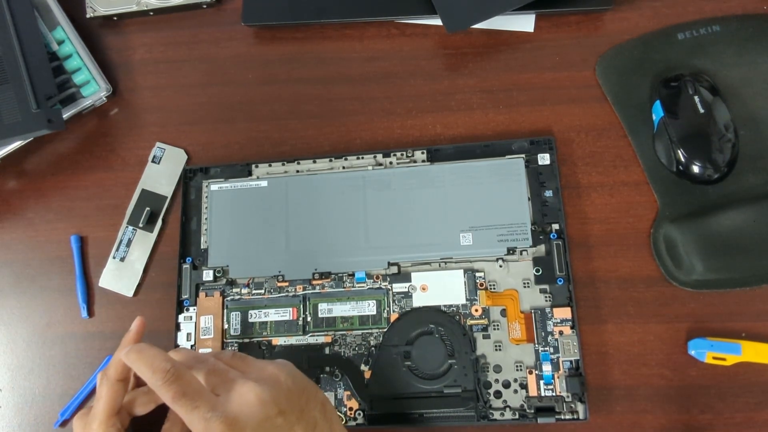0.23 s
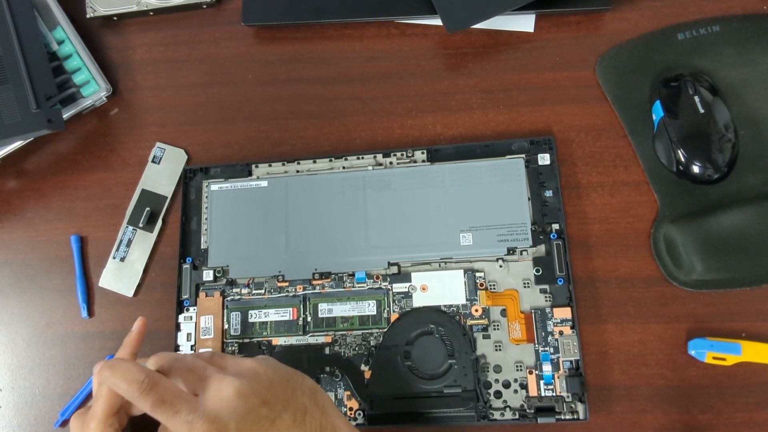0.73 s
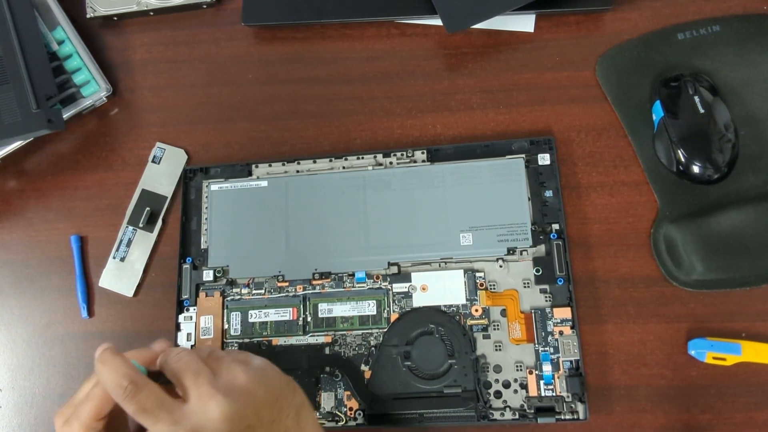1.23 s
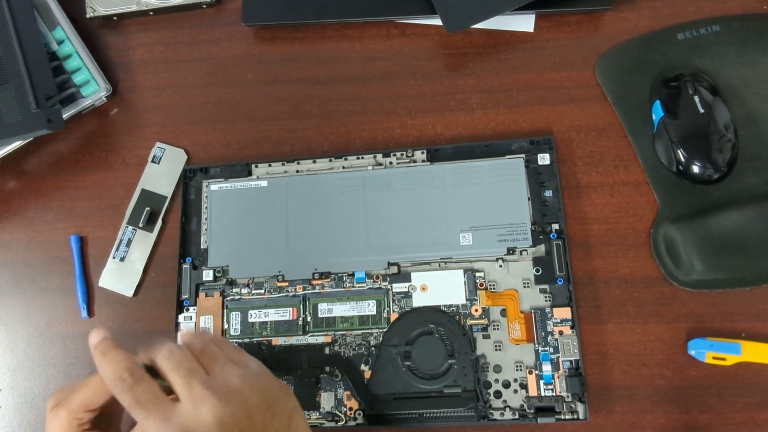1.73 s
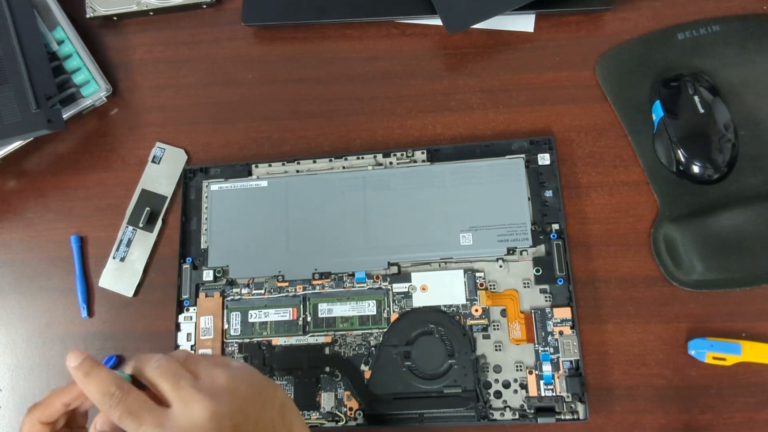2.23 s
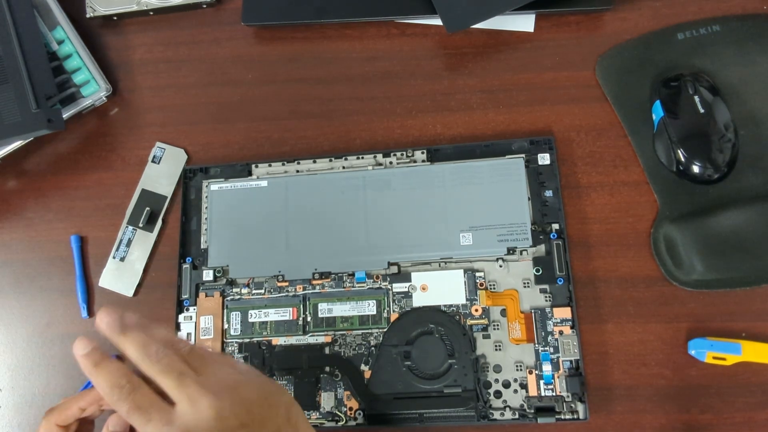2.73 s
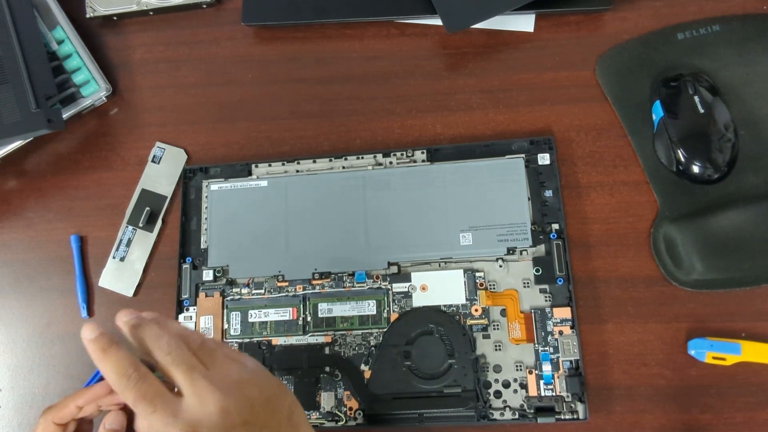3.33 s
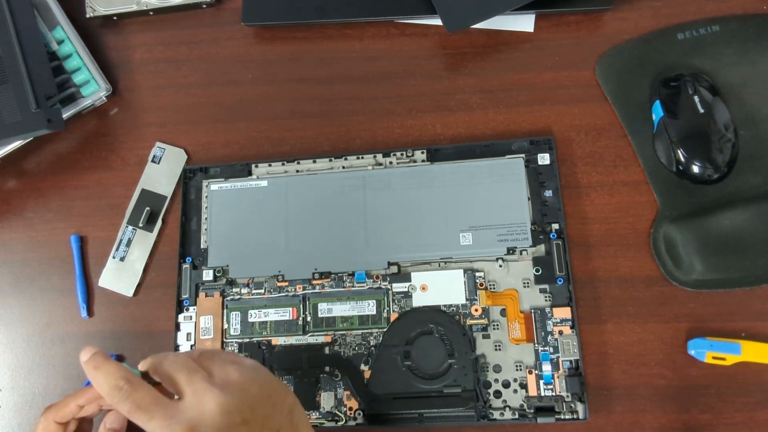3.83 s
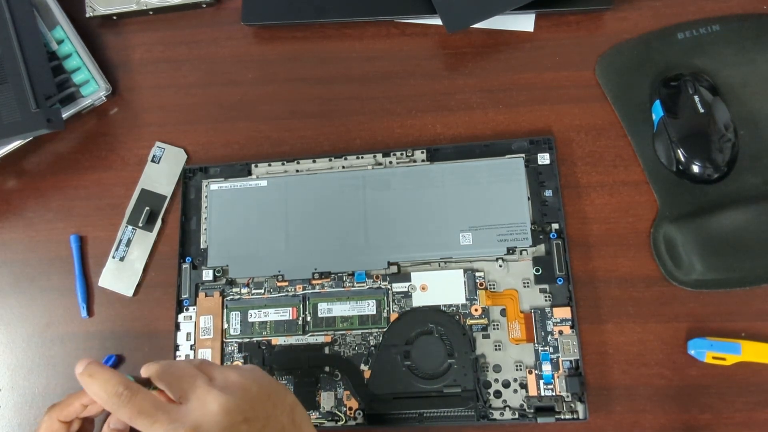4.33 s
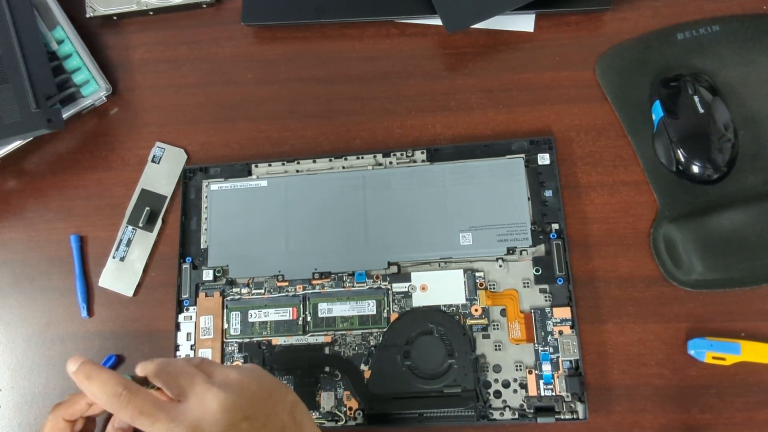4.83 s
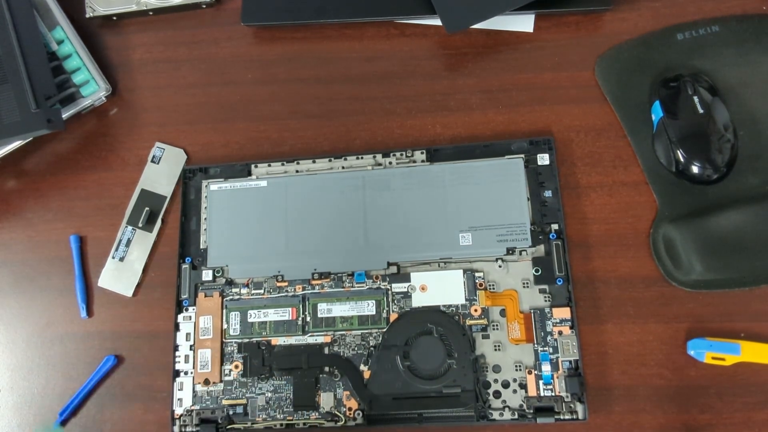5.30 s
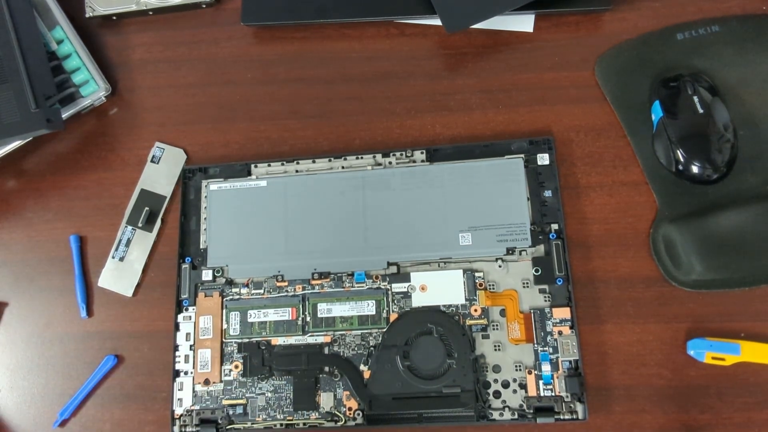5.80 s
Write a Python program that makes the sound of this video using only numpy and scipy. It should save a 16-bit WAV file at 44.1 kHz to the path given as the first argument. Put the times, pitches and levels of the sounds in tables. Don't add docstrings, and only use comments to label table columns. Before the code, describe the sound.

Close to the microphone, hands work a hard plastic tool: a handful of irregular clicks, the sharpest early on, with faint scuffs and dull desk knocks. The later clicks are weaker and sparser. Near the end the tool drops on the wooden desk and bounces, two loud ringing clacks. Behind lie low ventilation rumble, thin hiss and a faint clock tick, chopped by noise suppression.

```python
import sys
import numpy as np
from scipy import signal
from scipy.io import wavfile
from scipy.ndimage import uniform_filter1d

SR = 44100
rng = np.random.default_rng(int(sys.argv[2]) if len(sys.argv) > 2 else 0)


def volts(x):
    e = np.asarray(x, float) / 20
    return 10 ** e


def generate_wav(signal):
    frames = np.transpose(np.atleast_2d(signal))
    scaled = np.clip(frames, -1, 1) * 32767
    pcm = np.round(scaled).astype(np.int16)
    wavfile.write(sys.argv[1], SR, pcm)


N = 267246

# [bright crack, relative dB]
CLICKS = [(0.084, -41, 1100, -3.5, -27), (0.898, -44.5, 1700, -8.5, -53), (.98, -29, 1200, 7.5, -24),
          (1.4514, -22.5, 2830, -3, -21.5), (1.7883, -41, 1200, -1.5, -33), (2.0072, -38.5, 1220, 0.5, -33),
          (2.073, -55.5, 1250, -13, -42), (2.2562, -41.5, 4290, -10.5, -35), (2.5647, -53.5, 3000, 20, -29),
          (2.8691, -48, 1350, -9.5, -20.5), (3.1823, -61.5, 3100, -8.5, -44), (4.482, -42, 3950, -1, -16),
          (5.024, -53.5, 3150, -13, -5.5)]
# [time to fade by 60 dB, s]
SCUFFS = [(0.973, -60, 3080, -13, 0.036), (1.059, -69.5, 3180, -14, 0.059), (1.4227, -57.5, 1160, -6, 0.15),
          (1.684, -67.5, 2400, 18, 0.16), (1.946, -76.5, 3110, -14, 0.45), (2.324, -73, 1300, -3.5, 0.51),
          (2.651, -79, 2730, -5, 0.28), (2.95, -77.5, 1980, -1, 0.11), (3.279, -74.5, 3000, -10, 0.1),
          (3.588, -80, 3300, -7.5, 0.17), (4.676, -76.5, 1167, -22.5, 0.083), (5.3, -78, 3400, -27, .08),
          (5.35, -76.5, 3400, -20, 0.038), (5.58, -79, 1480, -6, 0.26), (5.8847, -37, 9950, -18.5, .11)]
# pitch_hz [Hz], width_hz [Hz], level_db [dB]
PLASTIC_RINGS = [(2202, 300, 6), (3150, 410, 3), (4944, 210, -11), (1200, 220, -2.5)]


def click(level_db, pitch_hz, rest_db, crack_db, t60_s, direct_db=-3):
    modes = [(pitch_hz, 280, 0)]
    modes += [(hz, width_hz, db + rest_db) for hz, width_hz, db in PLASTIC_RINGS]
    body = ring(room(t60_s, direct_db), modes)
    body = signal.lfilter(*signal.butter(2, [750, 5600], "band", fs=SR), body)
    crack_modes = [(7240, 1800, 0), (11120, 1000, 3), (13350, 5800, -10)]
    crack = ring(room(0.5 * t60_s, direct_db - 14.5), crack_modes)
    crack = signal.lfilter(*signal.butter(2, 5000, "high", fs=SR), crack)
    return peaked(body, level_db) + peaked(crack, level_db + crack_db)


# [share straight from the desk, dB]
DROPS = [
    (5.7139, -21, .18, 12),
    (5.864, -16, 0.21, 7.5),
]
# pitch_hz [Hz], width_hz [Hz], level_db [dB]
LANDING_RINGS = [
    [(397, 14, -2.5), (737, 34, 0), (1176, 120, -6), (1550, 44, 4), (2030, 120, -7), (2430, 120, 2),
     (2720, 240, -15), (3720, 166, -3.5), (3890, 140, -6.5), (5580, 48, -12), (9340, 990, -22.5)],
    [(573, 19, -13), (755, 35, 6.5), (1183, 150, -5.5), (1353, 52, 6), (1432, 110, 1.5), (1757, 14, 5),
     (2130, 27, -6), (2450, 85, -6.5), (2610, 33, -5.5), (3400, 270, -9.5), (4380, 43, -9.5),
     (6160, 560, -23), (9950, 130, -22.5)],
]
# pitch_hz [Hz], level_db [dB per Hz]
KNOCK_COLOURS = [
    [(59, -24), (100, -47.5), (398, 9.5), (535, -3.5), (801, 11.5), (1030, -2.5), (2580, 7), (5650, -8),
     (7610, -9.5), (11600, -17), (16000, -21)],
    [(59, -62), (100, -4.5), (433, 7.5), (801, 8.5), (2800, 7.5), (3780, -18.5), (4980, -17.5), (6420, -27),
     (7610, -29), (10200, -14), (16000, -17)],
]


def drop(level_db, t60_s, direct_db, modes, knock_colour):
    low, high = (signal.butter(1, 3500, kind, fs=SR) for kind in ("low", "high"))
    slow, quick = (room(share * t60_s, direct_db, wet_db=10.5, rattle_s=0.0055) for share in (1, 0.7))
    hit = signal.lfilter(*low, slow) + signal.lfilter(*high, quick)
    knock = peaked(colour(hit, knock_colour), 0)
    rings = peaked(ring(hit, modes), -4.5)
    return peaked(knock + rings, level_db)


# [deep thud, relative dB]
BUMPS = [(0.08, -48, 454, 0.25, -19), (0.897, -48, 355, 0.14, -17), (0.978, -55.5, 407, 0.16, -8),
         (1.205, -65, 392, 0.059, 2), (1.436, -51.5, 231, 0.36, 0), (1.453, -41.5, 347, 0.11, -6.5),
         (1.792, -47.5, 417, 0.17, 9.5), (2.016, -48, 300, 0.15, 5.5), (2.074, -45.5, 407, 0.14, 11),
         (2.327, -64.5, 394, 0.14, -1), (2.953, -65, 398, 0.2, 3), (3.182, -63, 482, 0.14, 10.5),
         (3.695, -65.5, 474, 0.026, -3), (3.81, -58.5, 315, 0.088, 4), (4.349, -57, 470, 0.088, 7),
         (4.363, -50, 398, 0.12, 6), (4.485, -48.5, 400, 0.14, 9), (4.677, -54.5, 336, 0.21, 7.5),
         (5.208, -63, 413, 0.084, -3), (6.016, -44.5, 356, 0.14, -5)]


def bump(level_db, pitch_hz, t60_s, thud_db):
    modes = [(pitch_hz, 100, 0), (1.9 * pitch_hz, 160, -11), (0.79 * pitch_hz, 110, -3), (135, 55, thud_db)]
    dull = signal.lfilter(*signal.butter(2, 750, fs=SR), room(t60_s, -14.5, rise_s=0.002))
    return peaked(ring(dull, modes), level_db)


# start_s [s], level_db [peak dB]
TICKS = [
    (0.81, -69.5),
    (1.814, -50.5),
    (2.813, -67),
    (3.809, -61.5),
    (4.812, -60.5),
    (5.809, -60.5),
]
# pitch_hz [Hz], width_hz [Hz], level_db [dB]
CLOCK_CASE = [(1127, 133, 9), (1350, 250, 2.5), (1796, 155, 3), (2260, 680, -3), (4370, 1800, -15.5),
              (10400, 6100, -26.5)]


def tick(level_db):
    case = ring(room(0.11, -56, rise_s=0.057), CLOCK_CASE)
    return peaked(signal.lfilter(*signal.butter(3, 980, "high", fs=SR), case), level_db)


# pitch_hz [Hz], level_db [dB per Hz]
AIR = [(90, -17), (140, -5), (185, 0.5), (228, -12), (285, -2), (400, -5), (790, -19), (1000, -24),
       (2000, -29.5), (2700, -30.5), (3300, -30.5), (4500, -37), (8000, -39), (16000, -41)]
# pitch_hz [Hz], likeness [0 to 1]
SAME = [(60, .97), (150, .92), (380, .65), (950, .3), (2400, .22), (6000, .1)]
# start_s [s], level_db [dB over the hiss]
HANDS = [
    (0.0, 6),
    (0.28, 13),
    (0.6, 3),
    (1.05, 7.5),
    (1.9, 10.5),
    (2.7, 8),
    (3.4, 7.5),
    (4.1, 4),
    (5.3, 6.5),
    (5.7, 12),
]


def hiss():
    hop, size = 256, 1024
    frames, hz = N // hop + 5, np.fft.rfftfreq(size, 1 / SR)
    a, b, c, d, patches = rng.standard_normal((frames, len(hz), 5)).T
    patches = uniform_filter1d(uniform_filter1d(patches, size=10, axis=0), size=6, axis=1)
    same = np.clip(read(SAME, hz), -1, 1)[:, None]
    left = a + 1j * b
    right = same * left + np.sqrt(1 - same ** 2) * (c + 1j * d)
    spectra = np.array([left, right]) * volts(read(AIR, hz)[:, None] + 0.86 * evened(patches))

    t = np.arange(frames) * hop / SR
    hum_db = -2 + 0.1 * shutting(t) + 0.82 * waking(t)
    rustle_db = np.interp(t, *np.transpose(HANDS)) + waking(t)
    hum_share = read([(600, 1), (1300, 0.2), (16000, 0.12)], hz)[:, None]
    rustle_share = read([(500, 0), (1100, 1), (4500, 1), (6000, 0.5)], hz)[:, None]
    swell = volts(hum_share * hum_db + rustle_share * rustle_db)
    steady, swelling = (signal.istft(spectra * gain, nperseg=size, noverlap=size - hop)[1][:, :N]
                        for gain in (1, swell))
    return volts(-73) * swelling / steady.std()


# pitch_hz [Hz], width_hz [Hz], level_db [dB]
DUCT = [(59.3, 45, 3), (99.7, 72, -8), (167, 6.7, -19)]


def rumble():
    shared, *ports = rng.standard_normal((3, N))
    duct = ring(shared + 0.14 * np.array(ports), DUCT)
    duct = signal.sosfilt(signal.butter(4, 200, fs=SR, output="sos"), duct)
    flutter = np.sqrt(uniform_filter1d((duct ** 2).mean(0), size=1200))
    t = np.arange(0, N + 64, 64) / SR
    level_db = -56 + shutting(t) + 0.2 * waking(t)
    return evened(duct / flutter ** 0.25) * volts(np.interp(np.arange(N) / SR, t, level_db))


# centre_s [s], change_db [dB], half_length_s [s]
SHUTS = [(0.0, -25, 0.021), (0.226, -9, 0.22), (0.394, -27, 0.026), (0.476, -29, 0.03), (0.633, -9, 0.035),
         (0.864, -7.5, 0.082), (.96, -27, 0.023), (1.0, 7.5, 0.035), (1.042, -11, 0.016),
         (1.158, -15.5, 0.1), (1.32, -10, .14), (1.568, -17, 0.059), (1.688, -18, 0.069), (1.824, -7, 0.11),
         (1.958, -23, 0.036), (2.14, -8.5, 0.029), (2.257, -15.5, 0.051), (2.44, -9.5, 0.11),
         (2.741, -16, 0.048), (3.048, -9, 0.043), (3.23, 6.5, 0.062), (3.445, -7.5, 0.053),
         (3.629, -9, 0.031), (4.11, -12, 0.065), (4.321, -15, 0.028), (4.6, -7, .08), (4.772, -18, 0.049),
         (4.952, -3.5, 0.2), (5.24, -8.5, 0.19), (5.5, -9.5, 0.15)]


def shutting(t):
    centre_s, change_db, half_s = np.transpose(SHUTS)[:, :, None]
    return (change_db * np.clip(1 - abs(t - centre_s) / half_s, 0, 1)).sum(0)


def waking(t):
    rise_db, rise_s = 20.5, 0.11
    since_landing = np.maximum(t - DROPS[-1][0], 0)
    return rise_db * (1 - np.exp(-since_landing / rise_s))


def room(t60_s, direct_db, wet_db=-12, rise_s=0.00033, rattle_s=0.0011):
    bass_hz, left_db = 850, 3.4
    first_touch = 3
    t = np.arange(SR // 3) / SR
    echoes = rng.standard_normal((3, len(t))) * (rng.random((3, len(t))) < 0.15)
    echoes *= volts(wet_db - 60 * t / max(t60_s, 0.03)) * (1 - np.exp(-t / rise_s))
    contact = (rng.standard_normal(len(t)) + first_touch * (t == 0)) * np.exp(-t / rattle_s)
    contact *= volts(direct_db) * np.sqrt(rattle_s * SR / 2) / np.linalg.norm(contact)
    low, high = (signal.butter(2, bass_hz, kind, fs=SR) for kind in ("low", "high"))
    ports = signal.lfilter(*low, contact + echoes[:1]) + signal.lfilter(*high, contact + echoes[1:])
    treble = signal.lfilter(*signal.butter(1, 3000, "high", fs=SR), ports)
    return ports + treble * (volts(np.array([[left_db], [-left_db]])) - 1)


def ring(x, modes):
    out = 0
    for k, (hz, width_hz, db) in enumerate(modes):
        pole = np.exp((2j * np.pi * hz - np.pi * width_hz) / SR)
        tone = 2 * signal.lfilter([1 - abs(pole)], [1, -pole], x + 0j).real
        out = out + (-1) ** k * volts(db) * tone
    return out


def colour(x, points):
    gain_db = np.maximum(read(points, abs(np.fft.fftfreq(4096, 1 / SR))), -100)
    log_gain = np.log(volts(gain_db))
    taps = np.fft.ifft(np.exp(np.conj(signal.hilbert(log_gain)))).real[:2048]
    return signal.fftconvolve(x, taps[None], axes=1)[:, :x.shape[1]]


def read(points, hz):
    f, value = np.transpose(points)
    return np.interp(np.log(hz + 1), np.log(f + 1), value)


def peaked(x, level_db):
    return x * volts(level_db) / np.sqrt(uniform_filter1d(x.mean(0) ** 2, size=176).max())


def evened(x):
    return x / np.sqrt(np.mean(x ** 2) + 1e-20)


def add(mix, start_s, sound):
    part = mix[:, round(start_s * SR):][:, :sound.shape[1]]
    part += sound[:, :part.shape[1]]


def scene():
    mix = rumble() + hiss()
    for start_s, level_db, *tone in CLICKS:
        t60_s = 0.095 + 0.0004 * (level_db + 47.5)
        add(mix, start_s, click(level_db, *tone, t60_s))
    for start_s, level_db, pitch_hz, rest_db, t60_s in SCUFFS:
        add(mix, start_s, click(level_db, pitch_hz, rest_db, -25.5, t60_s, direct_db=-20.5))
    for start_s, *knock in BUMPS:
        add(mix, start_s, bump(*knock))
    for start_s, level_db in TICKS:
        add(mix, start_s, tick(level_db))
    for (start_s, *landing), modes, knock_colour in zip(DROPS, LANDING_RINGS, KNOCK_COLOURS):
        add(mix, start_s, drop(*landing, modes, knock_colour))
    half_lag = round(0.00019 * SR / 2)
    return np.array([np.roll(mix[0], -half_lag), np.roll(mix[1], half_lag)])


def band_limit(x):
    return signal.sosfilt(signal.butter(12, 16480, fs=SR, output="sos"), x)


def record(dry):
    dry = signal.sosfilt(signal.butter(4, 42, "high", fs=SR, output="sos"), dry)
    dry = signal.oaconvolve(dry, signal.firwin(255, 16100, fs=SR)[None], "same")
    power_db = 10 * np.log10(abs(uniform_filter1d((dry ** 2).mean(0), size=900)) + 1e-12)
    under_db = np.clip(-57 - power_db, 0, 13)
    finished = dry * volts(-0.3 * uniform_filter1d(under_db, size=300))
    return band_limit(finished)


dry = scene()
out = record(dry)
generate_wav(out)
```